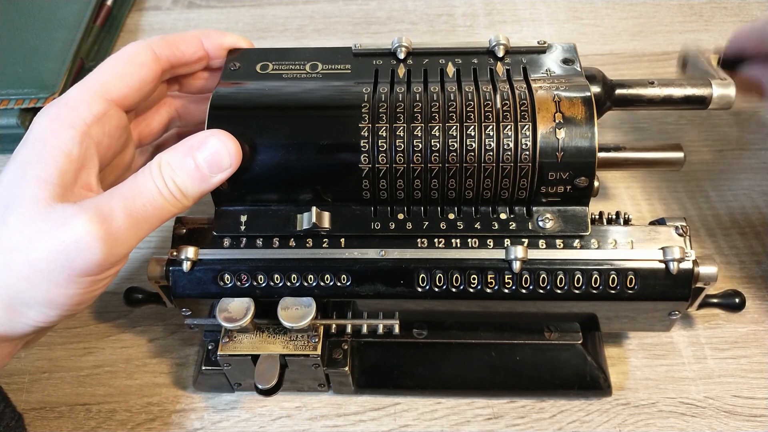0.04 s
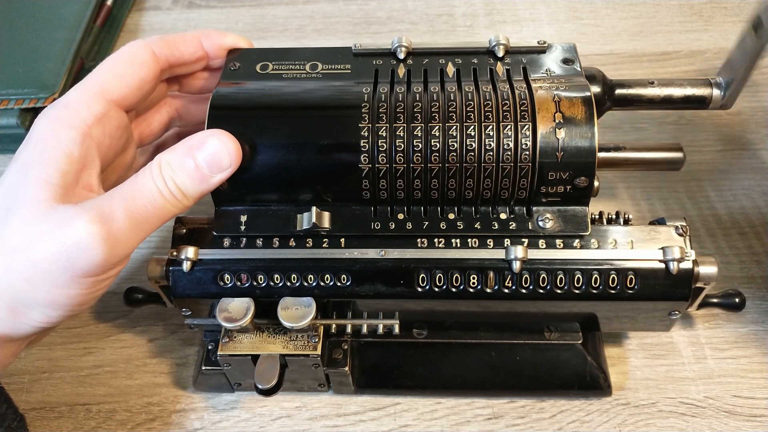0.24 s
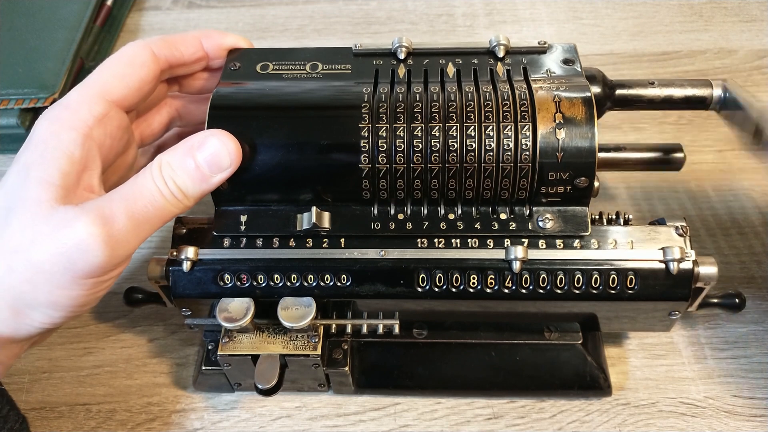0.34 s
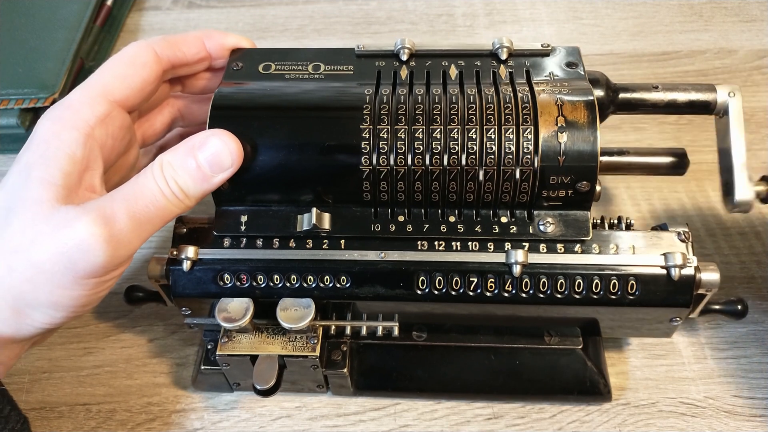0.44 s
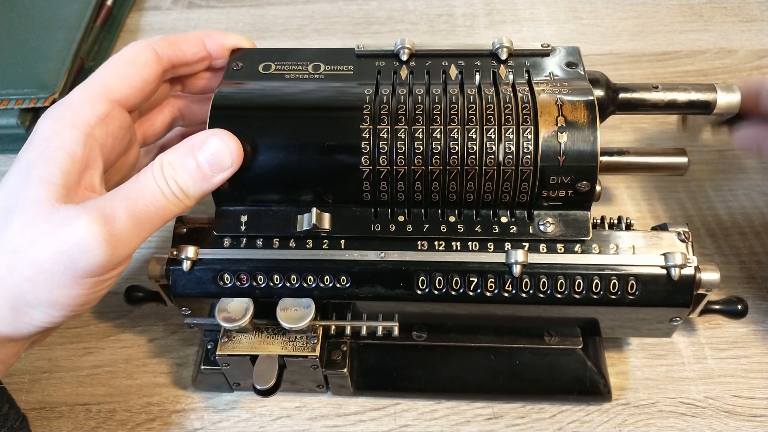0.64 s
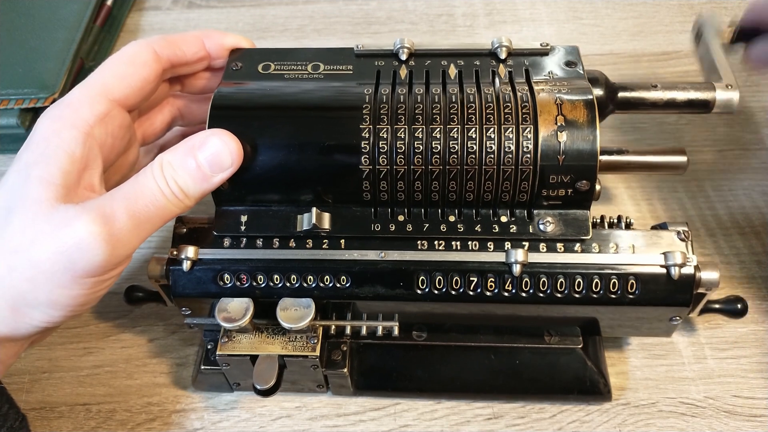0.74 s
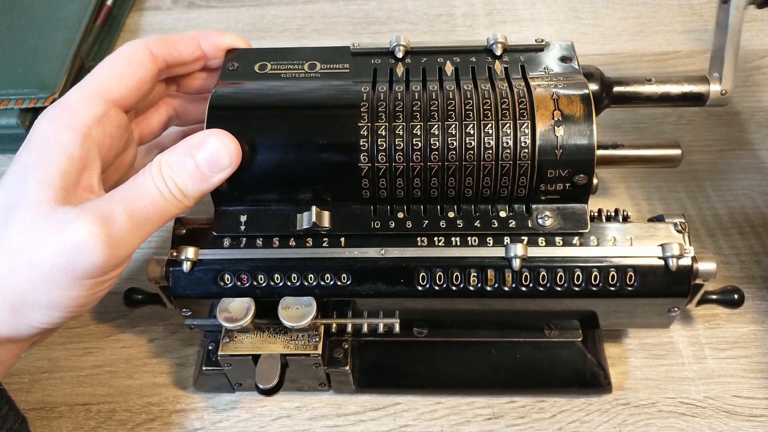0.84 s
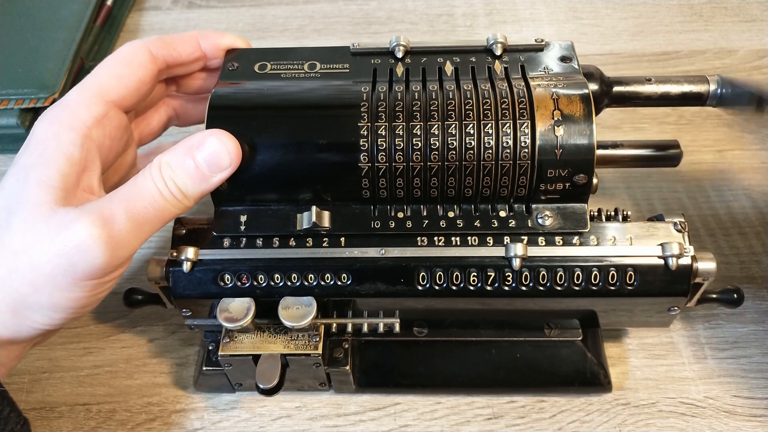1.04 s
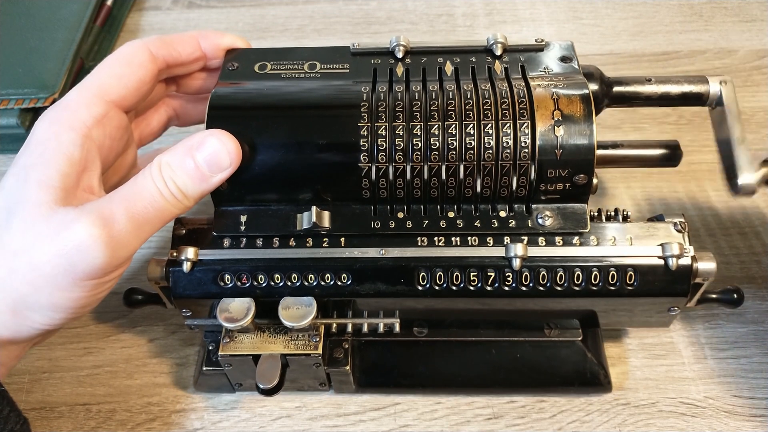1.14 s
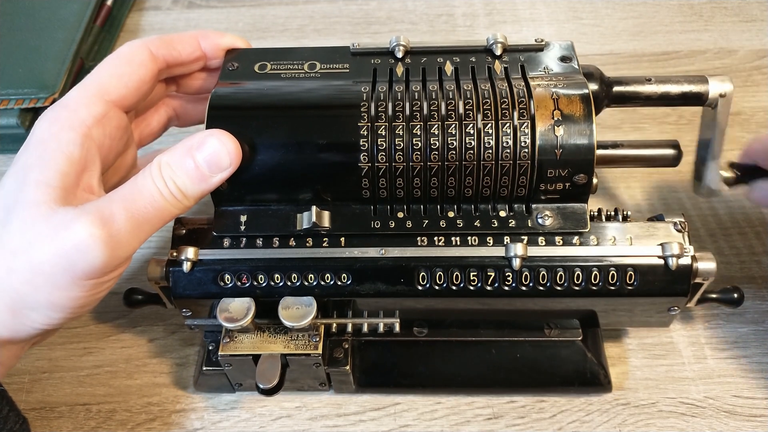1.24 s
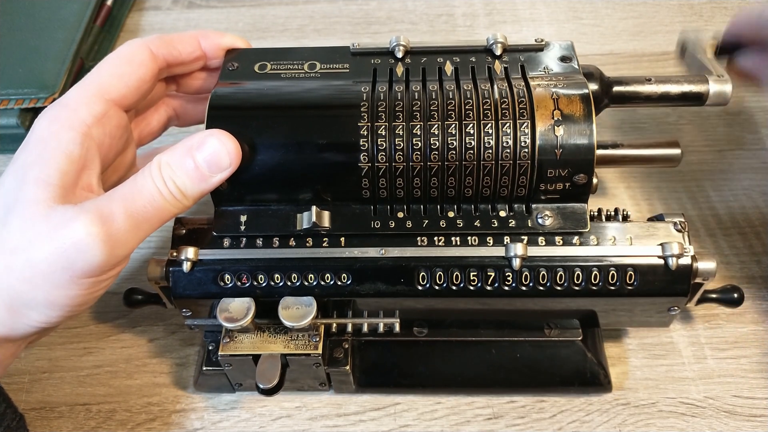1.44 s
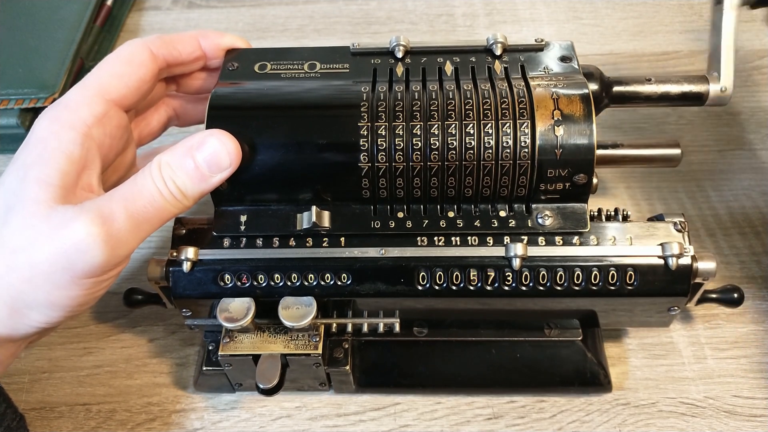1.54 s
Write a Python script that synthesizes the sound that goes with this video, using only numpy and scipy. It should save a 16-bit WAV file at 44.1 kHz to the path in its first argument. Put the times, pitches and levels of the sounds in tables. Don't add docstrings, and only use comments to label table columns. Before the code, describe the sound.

An old mechanical calculator is cranked twice on a wooden desk: two rapid bursts of bright steel clicks and gear whir, each followed by a single latch click, close stereo phone microphone, small quiet room.

```python
import sys
import numpy as np
from scipy import signal
from scipy.fft import rfft, irfft
from scipy.io import wavfile
from scipy.ndimage import uniform_filter1d

SR = 44100
rng = np.random.default_rng(int(sys.argv[2]) if len(sys.argv) > 2 else 0)


def convert_level_to_amplitude(level_db):
    exponent = np.asarray(level_db, float) / 20
    return 10 ** exponent


def waveform_to_disk(signal):
    frames = np.transpose(np.atleast_2d(signal))
    scaled = np.clip(frames, -1, 1) * 32767
    samples = np.round(scaled).astype(np.int16)
    wavfile.write(sys.argv[1], SR, samples)


N = 70560

# pitch [Hz], width [Hz], level [dB].
STEEL = [(1590, 100, -11), (2390, 150, 1.5), (4500, 280, -5.5), (5020, 230, -7), (6660, 150, 9.5),
         (7450, 390, 8.5), (8690, 200, 6), (9200, 340, 10), (10600, 400, -7), (12000, 500, -7.5),
         (14160, 500, -1)]
# time [s], load [dB].
LOAD = [(0.0, -53.5), (0.196, -66), (0.216, -29), (0.258, -26), (0.368, -25.5), (0.49, -39.5), (0.52, -44),
        (0.6, -76), (0.617, -49.5), (0.738, -71), (0.774, -42), (0.87, -49), (0.885, -33.5), (1.081, -25.5),
        (1.114, -36), (1.426, -60), (1.466, -52.5), (1.6, -61)]
RING_DB, RING_SCATTER_DB = -10, -0.5
SPAN = 8192
SWELL_S = 0.0024


def shape(outline, hz):
    f, db = np.array(outline).T
    return convert_level_to_amplitude(np.interp(np.log(hz + 1), np.log(f), db))


def unit(x):
    return x / np.sqrt(np.sum(x ** 2, axis=-1, keepdims=True))


def highpass(x, order, hz):
    return signal.sosfilt(signal.butter(order, hz, "high", fs=SR, output="sos"), x)


def modes(hz, db, t60):
    t = np.arange(SPAN) / SR
    return convert_level_to_amplitude(db)[:, None] * np.sin(2 * np.pi * hz[:, None] * t) * np.exp(-np.log(1000) * t / t60[:, None])


def swell():
    return 1 - np.exp(-np.arange(SPAN) / SR / SWELL_S)


def push(ms):
    return unit(np.hanning(int(ms * SR / 1000) + 3))


def add(out, x, s):
    i = int(s * SR)
    out[..., i:i + x.shape[-1]] += x[..., :N - i]


def ports(count):
    likeness = 0.54
    shared, *own = rng.standard_normal((3, count))
    return np.sqrt(likeness) * shared + np.sqrt(1 - likeness) * np.array(own)


def teeth():
    # time [s], peak [dB], rattle length [ms], knock into the frame [dB].
    turn_one = [(0.2121, -31, 12, 6.5), (0.2283, -20.5, 4.7, -16), (.234, -19.5, 4.2, -5),
                (0.2474, -21, 2.8, -12), (.2515, -24.5, 2.1, -15), (0.2672, -19, 2.7, -4),
                (.2712, -27, 1.9, -21), (0.2853, -18, 5.3, -21), (.2905, -19, 2.7, 0),
                (0.303, -16, 2.3, -5), (.3075, -18.5, 2.7, -7), (0.3167, -15.5, 3.3, -11.5),
                (0.3212, -10, 1.66, -8.5), (.3245, -23, 2.5, -3), (0.336, -18.5, 3.5, -12),
                (.341, -21, 2.2, -7), (0.3517, -16.5, 3.33, -4.5), (.356, -20.5, 3.5, -15),
                (0.3666, -19, 4.3, -14), (.3705, -22.5, 2.8, -1.5), (0.4062, -21, 3, -5),
                (0.4188, -12.5, 2.3, -10)]
    # time [s], peak [dB], rattle length [ms], knock into the frame [dB].
    turn_two = [(0.8778, -31.5, 6.1, 8.5), (0.896, -19.5, 5.4, -2), (0.904, -25, 3.7, -9),
                (0.9224, -20, 4.3, -12), (.928, -30, 3.3, 2), (0.951, -23, 6.1, -14), (.956, -27, 2.5, -4),
                (0.9765, -19.5, 4.3, -7), (0.9804, -26.5, 2.4, -1.5), (1, -19, 5.5, -3),
                (1.004, -26, 1.9, -1), (1.0165, -21, 3.8, -24), (1.0225, -18.5, 4.08, -4.5),
                (1.0274, -22, 5.2, -30), (1.0392, -16, 2, -6), (1.0428, -16.5, 3.1, -6),
                (1.048, -20, 2.9, -1), (1.064, -14.5, 2.6, -9), (1.0688, -20, 2.3, -24),
                (1.0832, -13, 2.4, -10), (1.087, -27.5, 1.5, -11), (1.135, -26.5, 6.9, -1.5),
                (1.1504, -16.5, 3.6, -9), (1.155, -30, 2.5, 1.5)]
    # time [s], peak [dB], rattle length [ms], knock into the frame [dB], brightness [dB per octave].
    latches = [(0.08, -62, 2.6, -11, 6), (.109, -45.5, 2, 2.5, -4), (.147, -55.5, 1, 13, -10),
               (.195, -50.5, 1.25, 0, -10), (0.6127, -24.5, 2.2, -9.5, 0.7), (.726, -47, 2, 5, -10),
               (.771, -65, 1.6, 5, -14), (0.855, -52, 2.5, -16, -20), (1.336, -22, 2.06, -14, 0.5),
               (1.463, -39, 2.4, 9.5, -4), (1.568, -58.5, 1.5, 11, -12), (1.578, -53.5, 2, 9.5, -15),
               (1.598, -30, 3.9, -4, 13)]
    # pitch [Hz], width [Hz], level [dB].
    latch_steel = [(1530, 150, -2.5), (1830, 150, -2.5), (2600, 200, 7), (4840, 200, 12.5),
                   (6900, 350, -2.5), (9000, 580, 12.5), (11100, 1100, 26)]
    bounce_within_s, bounce_tilt_db = 0.0075, -4.5
    knock_late_s = 0.0016
    clicks, knocks = np.zeros((3, N)), np.zeros(N)
    knock_force = push(0.29)
    for rows, *part in ((turn_one + turn_two, STEEL, RING_DB, RING_SCATTER_DB),
                        (latches, latch_steel, -5.5, 2)):
        last = -np.inf
        for s, db, ms, knock_db, *brightness in rows:
            tilt_db = sum(brightness) + bounce_tilt_db * (s - last < bounce_within_s)
            last = s
            crack, lead = rattle(ms)
            click = steel(crack, *part, tilt_db) * convert_level_to_amplitude(db + 15) * np.sqrt(ms / 3)
            add(clicks, click, s - lead / SR)
            knock = frame(knock_force, scatter_db=4, tilt_db=5) * convert_level_to_amplitude(db + knock_db + 4)
            add(knocks, knock, s + knock_late_s)
    return clicks, knocks


def rattle(ms):
    clicks_per_ms, scatter_db, first_hit_db, fall, skin_t60_s = 4, 1.5, 6.5, 1.28, 0.0035
    lead = 96
    t = np.arange(2048) / SR * 1000
    hit = (rng.random(len(t)) < clicks_per_ms * 1000 / SR) | (t == 0)
    hit_db = np.where(t == 0, first_hit_db, scatter_db * rng.standard_normal(len(t)))
    hits = hit * convert_level_to_amplitude(hit_db) * np.exp(-(t / ms) ** fall)
    fade = np.exp(-np.log(1000) / (skin_t60_s * SR))
    crack = signal.lfilter([1], [1, -fade], np.roll(hits, lead)) * ports(len(t))
    to_room = np.arange(len(t)) == lead + 40
    return np.vstack([crack, to_room]), lead


def steel(crack, rings=STEEL, ring_db=RING_DB, scatter_db=RING_SCATTER_DB, tilt_db=0):
    # frequency [Hz], level [dB per Hz].
    skin_outline = [(530, -16.5), (1100, -13.5), (1990, -13), (2300, -6), (3600, -13), (6310, -5.5),
                    (9310, 0), (15500, -8), (16500, -17)]
    narrowest_hz = 280
    patch_db = 4 * np.array([[1], [1], [0.083]])
    far_db = np.array([[0], [0], [-6.5]])
    rows, size = crack.shape
    hz, width, db = np.array(rings).T
    luck = rng.standard_normal((2, len(hz)))
    db = db + scatter_db * luck[1] + tilt_db * np.maximum(np.log2(hz / 5000), 0)
    ring = modes(hz * (1 + 0.0046 * luck[0]), db, 2.14 / np.maximum(width, narrowest_hz)).sum(axis=0)
    rung = signal.fftconvolve(crack, ring[None, :1024], axes=1)[:, :size]

    bins = np.arange(size // 2 + 1)
    octave = np.log2((bins + 1) * SR / size / 5000)
    wave = rng.random(2) * 2 * np.pi
    patches = np.sin(5 * octave + wave[0]) + np.sin(9 * octave + wave[1])
    skin = shape(skin_outline, bins * SR / size)
    skin = skin * convert_level_to_amplitude(tilt_db * np.maximum(octave, 0) + patch_db[:rows] * patches)
    contact = irfft(rfft(crack) * skin, size)
    return unit(unit(contact) + convert_level_to_amplitude(ring_db + far_db[:rows]) * unit(rung))


def frame(force, scatter_db=0, tilt_db=0):
    # pitch [Hz], level [dB], T60 [s].
    frame_modes = [(201, -5, 0.17), (228, 2, 0.031), (231.3, 5, 0.1), (293, 1, 0.08), (342.7, -6, 0.091),
                   (378, 0.5, 0.024), (446, 1, 0.061), (497, -8.5, 0.061), (572.7, -5.5, 0.064),
                   (704.6, -5, 0.032), (829.4, -8.5, 0.052), (1020, -15.5, 0.026)]
    hz, db, t60 = np.array(frame_modes).T
    luck = rng.standard_normal((2, len(hz))) * scatter_db
    db = db + luck[1] + tilt_db * np.log2(hz / 300)
    ring = modes(hz * (1 + 0.0057 * luck[0]), db, t60)
    sign = (-1) ** np.arange(len(hz))[:, None]
    ring = highpass((ring * sign).sum(axis=0) * swell(), 4, 175)
    return signal.fftconvolve(force, unit(ring))[:N]


def stops():
    # time [s], pitch [Hz], level [dB].
    stop_hits = [
        (0.366, 820, -35),
        (.409, 810, -28.5),
        (.428, 860, -30),
        (1.136, 817, -32.5),
        (.906, 835, -29.5),
        (1.18, 860, -36.5),
        (1.03, 435, -22),
        (0.99, 570, -28),
        (.213, 300, -26.5),
    ]
    out = np.zeros(N)
    for s, hz, db in stop_hits:
        ring = modes(np.array([hz]), np.array([db]), np.array([0.057]))[0]
        add(out, ring * swell(), s)
    return out


def whir():
    # start [s], end [s], level [dB].
    meshing = [
        (-.01, 0.044, -63),
        (.212, 0.396, -38.5),
        (.878, 1.1, -40.5),
        (.407, 0.446, -41),
        (1.2, 1.18, -42.5),
    ]
    rise_s, fall_s = 0.00097, 0.023
    t = np.arange(N) / SR
    mesh = np.zeros(N)
    for start, end, db in meshing:
        mesh += convert_level_to_amplitude(db) * np.clip(np.minimum((t - start) / rise_s, (end - t) / fall_s), 0, 1)
    contacts = uniform_filter1d(np.abs(grit()), size=30)
    return steel(contacts * ports(N)) * np.sqrt(N) * mesh


def grit():
    per_s = 2300
    return (rng.random(N) < per_s / SR) * rng.standard_normal(N) * np.sqrt(SR / per_s)


def load_db():
    s, db = np.array(LOAD).T
    return np.interp(np.arange(N) / SR, s, db)


def grind():
    rumble_db, tremor_db = -7.5, -67
    return grit() * convert_level_to_amplitude(load_db() + rumble_db) + convert_level_to_amplitude(tremor_db) * rng.standard_normal(N)


def thuds(power=0, early_s=0):
    # time [s], level [dB], push length [ms].
    pushes = [(0.223, -37, 0.61), (0.319, -25.5, 5.7), (.362, -27, 4.05), (0.499, -23.5, 4.3),
              (.512, -26, 3.1), (0.761, -26.5, 4.8), (0.798, -36.5, 2.1), (0.888, -28, 3.84),
              (0.979, -33, 4), (1.045, -25, 6.4), (1.07, -25.5, 5.8), (1.195, -30, 1.47),
              (1.233, -27.5, 4.5), (1.247, -42, 2.1), (1.317, -64, 1), (1.392, -39, 0.55),
              (0.667, -33, 0.31)]
    force = np.zeros(N)
    for s, db, ms in pushes:
        add(force, push(ms) * convert_level_to_amplitude(db) * (ms / 4) ** power, s - early_s)
    return force


def desk():
    # pitch [Hz], level [dB], T60 [s].
    desk_modes = [(116.8, 0, 0.31), (101, -4.5, 0.071), (78, -8, 0.037)]
    thud_db, rumble_db, tremor_db, slope = -4, -46, -64, 0.8
    load = convert_level_to_amplitude(slope * (load_db() + 24) + rumble_db) + convert_level_to_amplitude(tremor_db)
    force = thuds(power=0.74, early_s=0.00768) * convert_level_to_amplitude(thud_db) + load * rng.standard_normal(N)
    ring = modes(*np.array(desk_modes).T).sum(axis=0)
    ring = signal.sosfilt(signal.butter(4, 140, fs=SR, output="sos"), ring)
    return signal.fftconvolve(force, unit(ring))[:N]


def room():
    # frequency [Hz], level [dB].
    walls = [(300, 0), (1200, 2.5), (2300, 0.5), (3600, 1.5), (5200, -2.5), (6400, 2), (10000, -3.5),
             (15000, -6)]
    t60_s, top_t60_s, early_t60_s = 0.28, 0.18, 0.027
    late_db, early_db = -5, -2.5
    t = np.arange(SR // 2) / SR
    noise = rng.standard_normal((2, 2, len(t)))

    def fade(t60):
        return np.exp(-np.log(1000) * t / t60)

    low = signal.lfilter([0.25], [1, -0.75], noise[0])
    late = unit(low * fade(t60_s) + (noise[0] - low) * fade(top_t60_s)) * np.clip(t / 0.0041, 0, 1)
    late = irfft(rfft(late) * shape(walls, np.arange(len(t) // 2 + 1) * SR / len(t)), len(t))
    early = unit(noise[1] * fade(early_t60_s)) * (t > 0.0008)
    return convert_level_to_amplitude(late_db) * late + convert_level_to_amplitude(early_db) * early


def floor():
    # frequency [Hz], level [dB per Hz].
    tone = [(30, 21), (115, 9), (266, 4.5), (499, -3.5), (844, 4.5), (988, -7), (6050, -20.5),
            (9710, -18.5), (16000, -31)]
    hz = np.arange(N // 2 + 1) * SR / N
    mid, side = rfft(rng.standard_normal((2, N))) * shape(tone, hz)
    spread = np.clip(hz / 700, 0, 1) ** 2
    x = irfft(mid + spread * side * np.array([[1], [-1]]), N)
    return unit(x) * np.sqrt(N) * convert_level_to_amplitude(-59.5)


def to_left(x):
    # frequency [Hz], level [dB].
    shade = [(4000, 1), (7000, 0.5), (15000, -5)]
    lag_s, level_db = 0.000145, -2.5
    hz = np.arange(N // 2 + 1) * SR / N
    return irfft(rfft(x) * convert_level_to_amplitude(level_db) * shape(shade, hz) * np.exp(-2j * np.pi * hz * lag_s), N)


def scene():
    clicks, knocks = teeth()
    metal = clicks + whir()[[0, 1, 0]]
    body = knocks + stops() + frame(thuds() * convert_level_to_amplitude(0.5) + grind()) + desk()
    direct = np.array([to_left(metal[0]) + body, metal[1] + body])
    aired = convert_level_to_amplitude(-4) * highpass(body, 2, 400)
    wet = signal.fftconvolve(metal[2:] + aired, room(), axes=1)[:, :N]
    return direct + wet * convert_level_to_amplitude(np.array([[-0.5], [0]])) + floor()


def roll_off(x):
    return signal.sosfilt(signal.butter(12, 17000, fs=SR, output="sos"), x)


def record(dry):
    x = highpass(dry, 3, 95)
    x = signal.sosfilt(signal.ellip(8, 0.3, 38, 15900, fs=SR, output="sos"), x)
    return roll_off(x)


dry = scene()
out = record(dry)
waveform_to_disk(out)
```